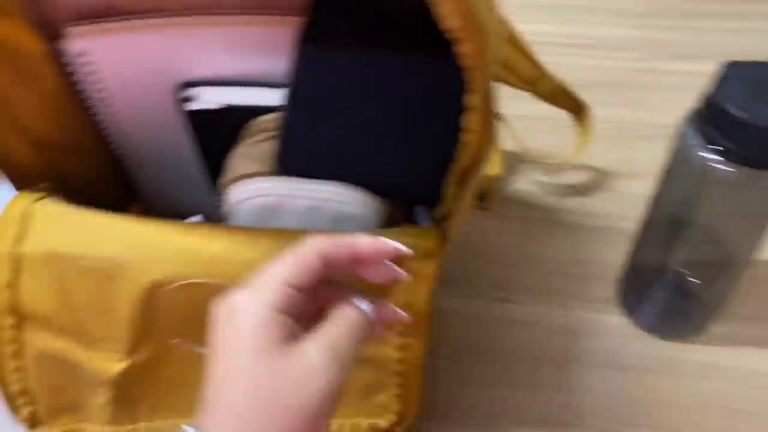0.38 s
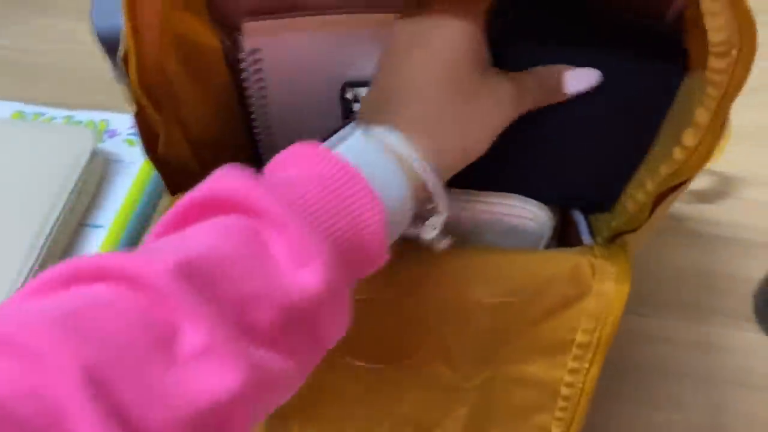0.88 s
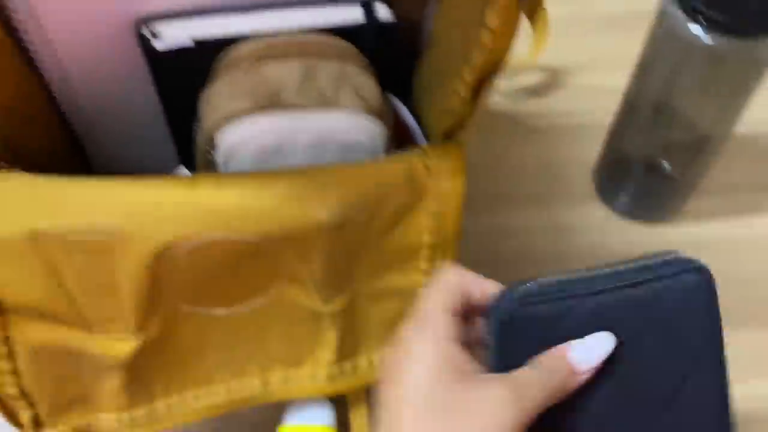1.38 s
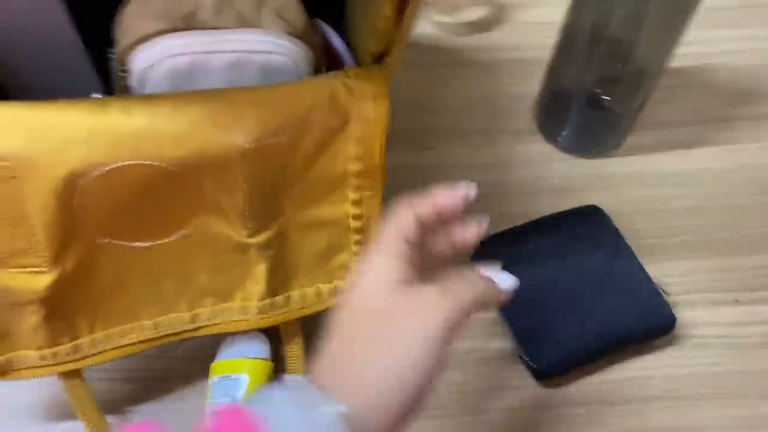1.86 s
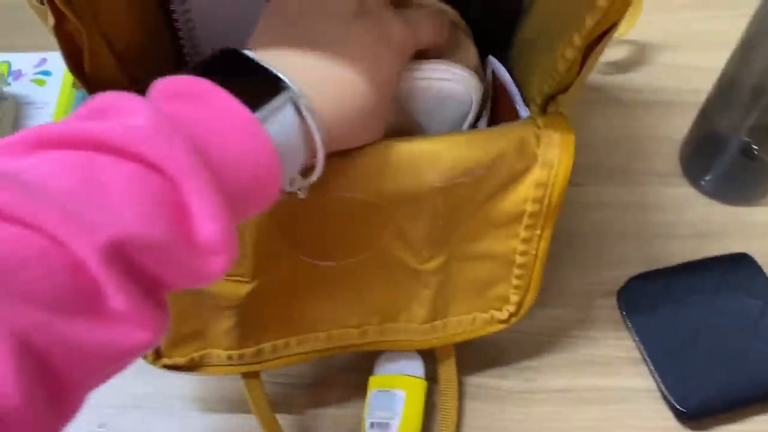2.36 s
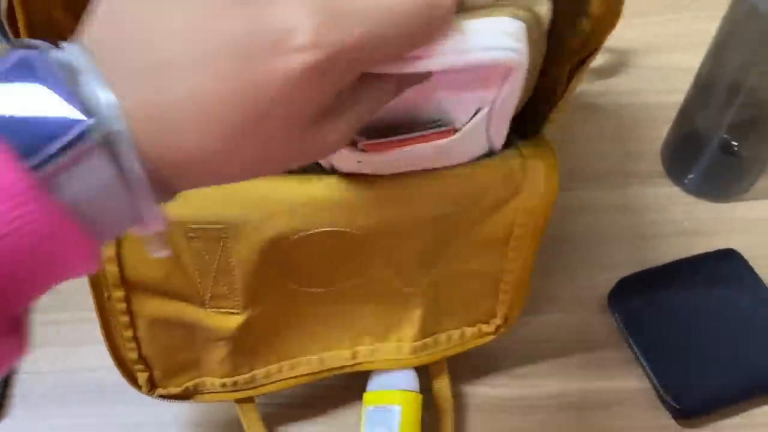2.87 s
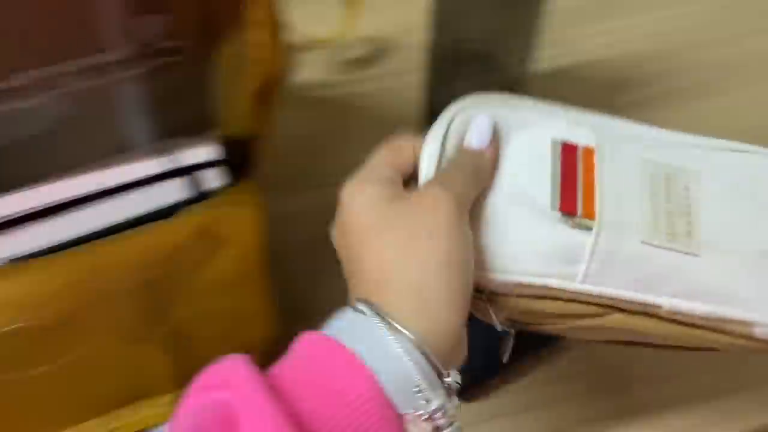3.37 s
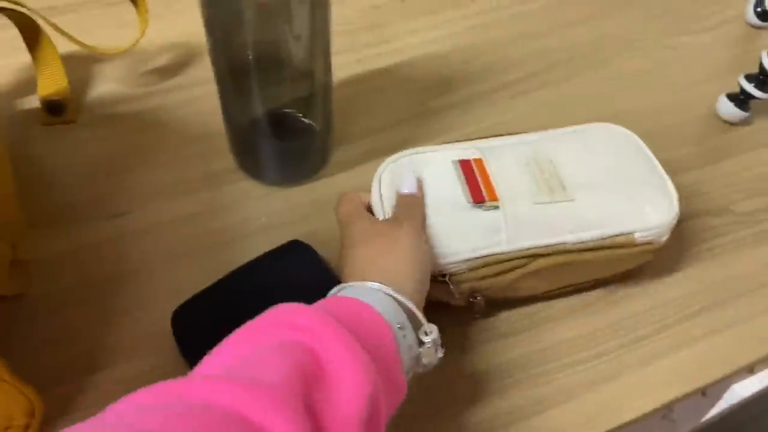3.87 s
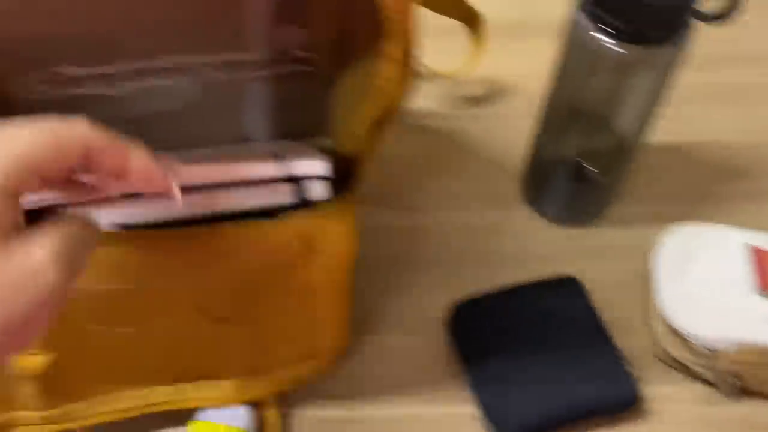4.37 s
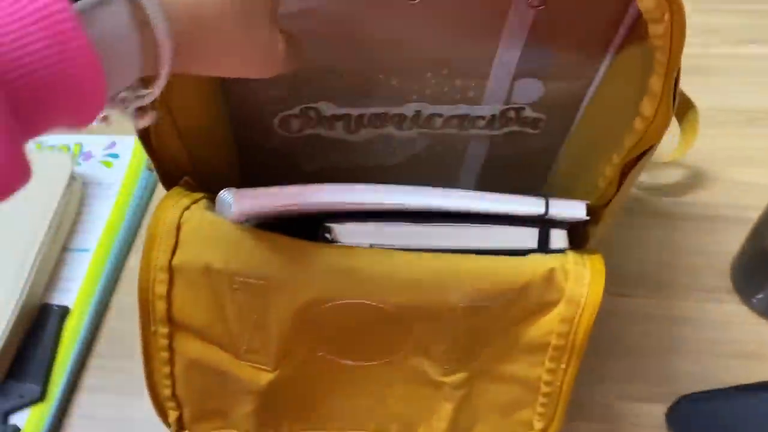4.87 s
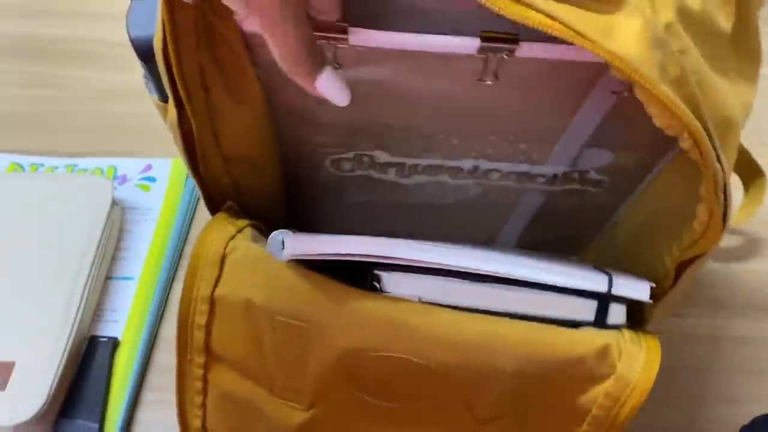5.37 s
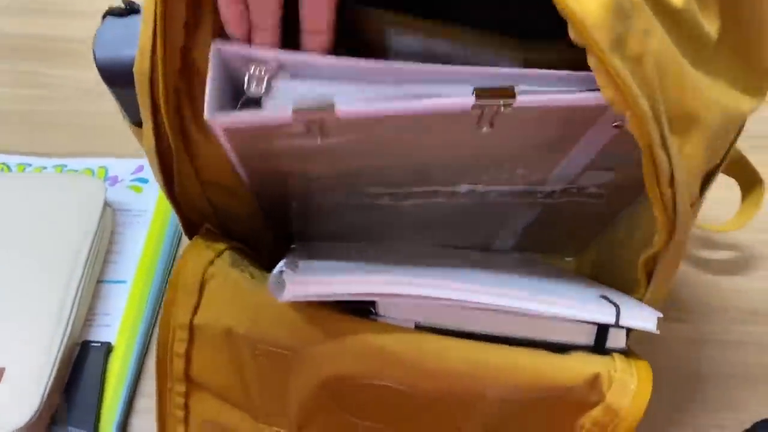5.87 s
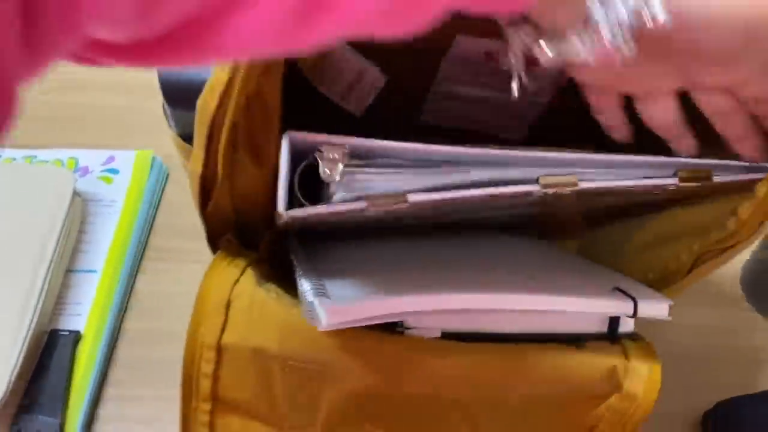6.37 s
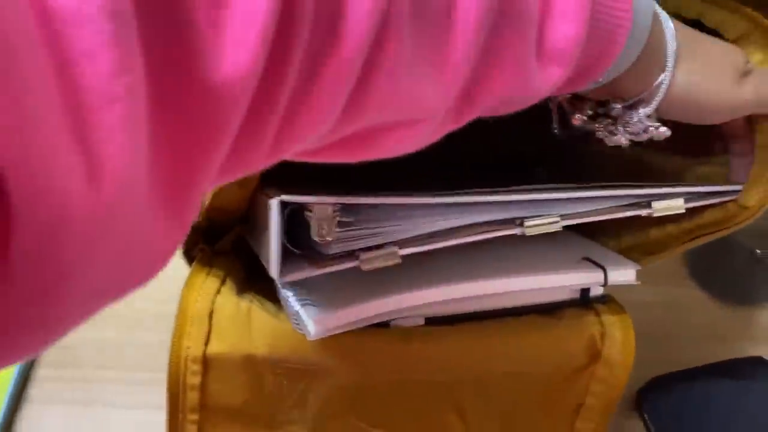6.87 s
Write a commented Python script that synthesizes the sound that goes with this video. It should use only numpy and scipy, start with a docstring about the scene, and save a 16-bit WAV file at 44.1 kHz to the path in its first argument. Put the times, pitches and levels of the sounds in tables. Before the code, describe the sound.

Pouches dragged from a cloth bag and set on wood with dull thumps, then a binder shuffled with rubbing, clacks and a loud snap.

```python
"""First a soft boom, faint crinkling cloth and a thin hiss; then knocks, ticks and heavier thuds on a desk.
A hand pulls a wallet and a pencil case out of a canvas backpack, sets them on wood and leafs through a binder.
Rubbing is noise in bursts of slips through resonances; weight adds free swings of the desk;
knocks are decaying tones with a noisy slap, ticks are short bright cracks, and both leave a short tail.
A hand-held phone with two microphone ports hears it from close by in a quiet room."""
import sys
import numpy as np
from scipy import signal
from scipy.fft import rfft, irfft, next_fast_len
from scipy.io import wavfile
from scipy.ndimage import uniform_filter1d

SR = 44100
rng = np.random.default_rng(int(sys.argv[2]) if len(sys.argv) > 2 else 0)


def voltage_ratio(decibels):
    """Convert decibels (scalar or array-like) to amplitude ratios, 20 dB per decade."""
    exponent = np.asarray(decibels, float) / 20
    return 10 ** exponent


def to_wav(s):
    """Save 16-bit WAV."""
    ch = np.atleast_2d(s).T  # columns
    pcm = np.round(np.clip(ch, -1, 1) * 32767)  # PCM
    wavfile.write(sys.argv[1], SR, pcm.astype(np.int16))


N = 308259
PAD = next_fast_len(N + SR)
HZ = np.maximum(np.fft.rfftfreq(PAD, 1 / SR), 1)

# air inside bag and pouches: f/Hz, width/Hz, relative level/dB
HOLLOW = [(358, 310, -0.5), (486, 120, -4), (640, 177, -2)]
# colour of scraping cloth, also of a knock's slap: f/Hz, relative density/dB per Hz
SCRAPE = [(470, -25), (800, -7), (1260, -6), (1490, -7), (2220, -10.5), (4320, -19.5), (6500, -25.5),
          (11000, -120)]
# weight lands or shifts on the desk: t/s, time to fade 20 dB/s, desk boom level/dB, bag body level/dB
# (a fade below zero: the noise lasts about 1 ms, the free swing grows until it stops)
SHOVES = [(0.0, 0.1264, -45, -59.5), (.3, 1.5, -70, -72.5), (.8, 0.25, -49.5, -63), (.97, 0.07, -52, -59),
          (1.311, .1, -49, -69), (1.44, 0.32, -46, -58), (1.581, 0.3453, -31.5, -41),
          (1.75, 0.15, -32.5, -35), (1.86, 0.1, -29.5, -33), (1.97, 0.21, -41.5, -60.5),
          (3.085, 0.18, -44.5, -45.5), (3.15, 0.28, -45, -53), (3.321, 0.07, -41, -49.5),
          (3.776, 0.1372, -44, -46.5), (3.95, 0.26, -54, -59), (4.076, 0.15, -37.5, -52),
          (4.279, 0.23, -56, -71), (4.76, 0.12, -46, -53), (4.85, 0.35, -46, -50),
          (5.15, 2.03, -59.5, -56.5), (5.34, 0.5, -54.5, -49.5), (5.641, 0.9, -53, -54),
          (5.78, 0.26, -51.5, -46.5), (5.949, 0.3, -51, -44.5), (6.04, -0.1, -47, -65.5),
          (6.21, 0.15, -28, -34), (6.29, 0.27, -29.5, -37), (6.42, 0.13, -28, -41.5),
          (6.6, 1.1, -46.5, -46.5), (6.85, 0.4, -47, -46)]
SHOVE_RISE = 0.2397  # rise time as a share of the fade


def unit(x):
    """Scale to rms 1."""
    return x / np.sqrt(np.mean(x ** 2))


def on_log(table):
    """A (f/Hz, value) table on the frequency axis, straight over log frequency."""
    hz, value = np.transpose(table)
    return np.interp(np.log(HZ), np.log(np.maximum(hz, 1)), value)


def on_time(table, rise, rounding):
    """Power of each level column over time: events rise and fade (rounding 1 = pointed top) and add up."""
    s, fade, *columns = np.transpose(table)[:, :, None]
    t = np.arange(0, N / SR + .002, .001)
    reach = np.abs(t - s) / np.maximum(fade * np.where(t < s, rise, 1), 1e-3)
    swell = voltage_ratio(-20 * reach ** rounding) ** 2
    powers = [np.sum(voltage_ratio(db) ** 2 * swell, axis=0) for db in columns]
    return np.array([np.interp(np.arange(N) / SR, t, power) for power in powers]) + 1e-14


def modes(table):
    """Gain of a set of resonances: each falls to half at half its width from the centre."""
    return sum(voltage_ratio(db) / (1 + (2 * (HZ - hz) / width) ** 2) for hz, width, db in table)


def shape(x, gain):
    """Filter by a gain over frequency."""
    return irfft(rfft(x, PAD) * gain, PAD)[..., :N]


def add(out, s, sound):
    """Mix a sound in at a time."""
    i = int(s * SR)
    out[:, i:i + sound.shape[-1]] += sound[..., :N - i]


def ports(envelope, gain):
    """Coloured noise under one envelope at both ports, partly shared and partly their own; rms 1."""
    # likeness of the two ports: f/Hz, shared part of the power/0-1
    likeness = [(60, .95), (250, .88), (700, .5), (6500, .4), (8000, .95), (10000, .995)]
    shared, left, right = rfft(envelope * rng.standard_normal((3, N)), PAD)
    alike = np.clip(on_log(likeness), 0, 1)
    both = np.sqrt(alike) * shared + np.sqrt(1 - alike) * np.array([left, right])
    return unit(irfft(gain * both, PAD)[:, :N])


def grains(rate, spread_db, smear_s):
    """Envelope of random slips per second: most small, a few large, sharp at the start, with a short tail."""
    size = voltage_ratio(spread_db * np.minimum(rng.exponential(size=N), 4))
    hits = (rng.random(N) < rate / SR) * size
    return np.sqrt(signal.lfilter([1], [1, -np.exp(-1 / (smear_s * SR))], hits ** 2) + 1e-12)


def rubbed(gain, db, rate, spread_db, smear_s):
    """Slips of friction ring one set of resonances."""
    return voltage_ratio(db) * ports(grains(rate, spread_db, smear_s), gain)


def patches(table, db, low_hz, step, width, rate, spread_db, smear_s, size, count):
    """Patches slip at once, each with its own timing and every count-th of size resonances a ratio step apart."""
    out = 0
    for k in range(count):
        pitches = low_hz * step ** np.arange(k, size, count)
        gain = modes([(hz, width * hz, 0) for hz in pitches]) * voltage_ratio(on_log(table))
        out = out + np.sqrt(np.mean(gain ** 2)) * rubbed(gain, 0, rate, spread_db, smear_s)
    return voltage_ratio(db) * unit(out)


def room():
    """The faint steady air of the room: coloured noise."""
    # colour of the air: f/Hz, relative density/dB per Hz
    air = [(18, -39), (30, -4), (66, 5.5), (235, -4), (1600, -30), (6550, -28), (8310, -36.5), (11400, -25),
           (13400, -58.5), (15200, -25), (16500, -36.5)]
    return voltage_ratio(-74) * ports(1, voltage_ratio(on_log(air)))


def hisses():
    """Something slides with a faint narrow hiss: noise through one resonance."""
    # slides: middle t/s, time to fade 20 dB/s, level/dB
    slides = [(.38, 0.15, -74), (.5, .12, -88), (.64, 0.13, -76)]
    power, = on_time(slides, rise=1, rounding=1.49)
    return np.sqrt(power) * ports(1, modes([(1583, 230, 0)]))


def desk_boom(db):
    """The loaded desk booms: long slips ring its lowest resonances."""
    # boom of the desk: f/Hz, width/Hz, relative level/dB
    boom = [(54.4, 32, -2.5), (62, 15, 1), (78.9, 4.2, 8.5), (105.5, 25, -2.5)]
    return rubbed(modes(boom), db, rate=300, spread_db=1.51, smear_s=0.032)


def bag_body(db):
    """Bag and desk top shake together: shorter slips ring their body resonances."""
    # bag and desk top: f/Hz, width/Hz, relative level/dB
    body = [(128, 30, 6.5), (199.6, 89, 4), (250, 65, -3.5)]
    return rubbed(modes(body), db, rate=120, spread_db=2.26, smear_s=0.0054)


def bag_hollow(db):
    """Slips of cloth ring the air inside bag and pouches."""
    return rubbed(modes(HOLLOW), db, rate=150, spread_db=3.5, smear_s=0.013)


def contents(db):
    """Small things inside bump each other: sparse, very short slips through hollow and scrape colours."""
    gain = modes(HOLLOW) + voltage_ratio(on_log(SCRAPE) - 5.0)
    return rubbed(gain, db, rate=25, spread_db=3, smear_s=0.0034)


def scrape(db):
    """Cloth scrapes in dense short slips while stiff panels drag on narrow resonances."""
    cloth = rubbed(voltage_ratio(on_log(SCRAPE)), db - 8, rate=500, spread_db=2.5, smear_s=0.003)
    panels = patches(SCRAPE, db - 4.5, low_hz=790, step=1.16, width=.085,
                     rate=60, spread_db=4, smear_s=.014, size=16, count=4)
    return cloth + panels


def crinkle(db):
    """Creases snap in rare brief slips on broad resonances; canvas rustles in denser, longer ones."""
    # colour of the crinkle: f/Hz, relative density/dB per Hz
    colour = [(2500, -7.5), (4000, -6), (5500, -11), (8000, -3), (11000, -10), (14000, -5.5), (15800, -12),
              (16300, -36.5)]
    creases = patches(colour, db - 4, low_hz=3000, step=1.7, width=.6,
                      rate=20, spread_db=4, smear_s=.0015, size=4, count=4)
    canvas = patches(colour, db + 2.5, low_hz=2200, step=1.2, width=.17,
                     rate=160, spread_db=3, smear_s=.007, size=12, count=4)
    return creases + canvas


def thumps():
    """Each shove also sets the desk swinging freely, its pitch varying a little at random from shove to shove."""
    out, t = np.zeros((2, N)), np.arange(SR // 2) / SR
    for (s, fade, boom_db, _), chance in zip(SHOVES, rng.standard_normal(len(SHOVES))):
        hz = 66 * (1 + 0.073 * chance)
        swell = 1 - np.exp(-t / 0.0091)
        ring = np.sin(2 * np.pi * hz * t) * voltage_ratio(-20 * t / fade) * swell
        start = max(s - SHOVE_RISE * fade / 2, 0)
        add(out, start, voltage_ratio(boom_db - 3) * ring / abs(ring).max())
    return out


def echo(x, t60, db):
    """Desk top and near walls return a short, dull tail, different at each port."""
    t = np.arange(SR // 4) / SR
    tail = rng.standard_normal((2, len(t))) * np.exp(-np.log(1000) * t / t60) * (1 - np.exp(-t / 0.003))
    tail = signal.lfilter([1], [1, -.6], tail)
    tail = voltage_ratio(db) * tail / np.sqrt(np.sum(tail ** 2, axis=1, keepdims=True))
    return x + signal.fftconvolve(x, tail, axes=1)[:, :N]


def ticks():
    """A hard contact: a crack of a few ms, brightest around its centre, weak an octave below."""
    # nails, zip pulls, charms and clips: t/s, peak level/dB, centre f/Hz, t60/s
    contacts = [(0.291, -52, 10430, 0.019), (0.698, -27.5, 4230, 0.0075), (.734, -36, 3000, 0.0065),
                (0.989, -38.5, 10600, .011), (1.0137, -41, 7150, .01), (1.188, -42.5, 11400, 0.017),
                (1.6139, -27.5, 2530, 0.0069), (1.646, -31, 2200, 0.0071), (1.96, -35, 2000, 0.027),
                (2.3228, -33, 2890, 0.013), (2.339, -24.5, 9300, 0.005), (2.5046, -36.5, 2300, 0.0084),
                (2.662, -32, 4360, 0.01), (2.803, -35, 9500, 0.0072), (2.848, -36.5, 3740, 0.016),
                (3.1354, -35, 4020, 0.015), (3.6187, -39, 11270, 0.014), (3.8935, -27, 10900, 0.032),
                (4.282, -42, 11900, 0.014), (4.8216, -36, 7260, .012), (4.97, -43.5, 1300, .012),
                (5.251, -32, 4040, 0.028), (5.5575, -37.5, 3720, 0.011), (5.578, -34, 10200, 0.012),
                (5.7916, -8.5, 8400, 0.0074), (5.945, -31, 6500, 0.012), (5.953, -29, 10100, 0.011),
                (6.0556, -32.5, 1700, 0.008), (6.173, -25.5, 7500, .012), (6.2013, -24, 3230, 0.004),
                (6.474, -20, 11600, 0.0027), (6.7517, -34.5, 9150, 0.0043)]
    out, t = np.zeros((2, N)), np.arange(SR // 20) / SR
    noise = rng.standard_normal((len(contacts), len(t)))
    for (s, db, hz, t60), n in zip(contacts, noise):
        crack = signal.lfilter(*signal.butter(2, 0.94 * hz, "high", fs=SR), n)
        crack = crack + 1.33 * signal.lfilter(*signal.iirpeak(min(hz, 15000), 3.2, fs=SR), n)
        crack = signal.lfilter(*signal.butter(1, min(3 * hz, .45 * SR), fs=SR), crack)
        crack = crack * np.exp(-np.log(1000) * t / max(t60, .002)) * (1 - np.exp(-t / 0.0011))
        add(out, s, voltage_ratio(db) * crack / abs(crack).max())
    return out


def blows(table, sag):
    """A blow swells within a cycle, rings at its pitch and two weaker neighbours, and slaps."""
    sag_s = .005  # time constant of losing the share sag of the pitch
    out, t = np.zeros((2, N)), np.arange(SR // 5) / SR
    chance = rng.random((len(table), 4))
    noise = rng.standard_normal((len(table), len(t)))
    slaps = shape(noise, voltage_ratio(on_log(SCRAPE)))[:, :len(t)]
    slap_fade = np.exp(-t / 0.0029) * (1 - np.exp(-t / 0.00079))
    for (s, db, hz, t60, slap_db), c, slap in zip(table, chance, slaps):
        fade = np.exp(-np.log(1000) * t / max(t60, .005))
        turns = hz * ((1 - sag) * t + sag * sag_s * (1 - np.exp(-t / sag_s)))
        ring = np.sin(2 * np.pi * turns)
        ring = ring + voltage_ratio(-11.0) * np.sin(2 * np.pi * ((1.353 + 0.4 * c[0]) * turns + c[1]))
        ring = ring + voltage_ratio(-9.0) * np.sin(2 * np.pi * ((0.544 + 0.22 * c[2]) * turns + c[3]))
        ring = ring * fade * (1 - np.exp(-t * hz * 1.43))
        # a small object radiates little below its own pitch
        ring = signal.lfilter(*signal.butter(2, (1 - sag) * hz / 2, "high", fs=SR), ring)
        slap = voltage_ratio(slap_db + 0.5) * unit(slap) * slap_fade
        add(out, s, voltage_ratio(db) * (ring / abs(ring).max() + slap))
    return out


def knocks():
    """Knocks of objects, and one faint high metal ring, at steady pitches."""
    # struck objects: t/s, peak level of the ring/dB, pitch f/Hz, t60/s, slap level relative to the ring/dB
    struck = [(.699, -40.5, 653, 0.03, -10), (.733, -45, 673, 0.1, -1), (.927, -48.5, 640, 0.037, -20),
              (1.613, -27, 1030, 0.027, 5.5), (1.615, -38, 6200, 0.13, -30),
              (1.627, -30.5, 1040, 0.0156, 7.5), (1.6465, -27, 1290, 0.04, 6.5),
              (1.713, -21.5, 143, 0.018, -32), (1.728, -27.5, 205, 0.029, -30),
              (1.762, -15, 138, 0.012, -43), (1.947, -25, 182, 0.04, -32), (2.197, -37.5, 486, 0.034, -13),
              (2.324, -31, 760, 0.0082, -16), (2.338, -35, 640, 0.026, 3), (2.419, -36, 457, 0.061, -28),
              (2.619, -35, 620, 0.016, -2), (2.662, -21.5, 265, 0.03, -13), (2.931, -37.5, 236, 0.078, -20),
              (3.052, -32.5, 322, 0.14, -31), (3.136, -25.5, 460, 0.019, -9),
              (3.301, -35, 250, 0.019, -6.5), (3.749, -28, 429, 0.098, -22), (3.7525, -30, 520, .04, -3.5),
              (3.886, -37, 473, .05, -9.5), (3.893, -34, 476, 0.056, -10),
              (5.062, -44.5, 1650, 0.023, -8.5), (5.063, -39, 546, .04, -30),
              (5.35, -30.5, 203, 0.036, -18), (5.357, -28, 586, 0.018, -14.5), (5.793, -26, 750, 0.011, -9),
              (5.833, -34.5, 640, 0.07, -25.5), (5.862, -37, 616, 0.09, -26),
              (6.2015, -23, 600, 0.019, -10), (6.259, -21, 148.8, 0.015, -16),
              (6.853, -32.5, 560, 0.08, -12), (6.902, -40.5, 1555, .06, 2)]
    return blows(struck, sag=0)


def covers():
    """Stiff covers slap shut, their ring sagging to a quarter of its first pitch."""
    # slaps: t/s, peak level of the ring/dB, first pitch f/Hz, t60/s, slap level relative to the ring/dB
    stiff = [(2.53, -29.5, 896, 0.032, -29.5), (5.9235, -20.5, 978, 0.042, -14.5),
             (5.9455, -18, 880, 0.043, -10)]
    return blows(stiff, sag=.75)


def handling():
    """The hand works bag and cloth: strokes and settling contents rub, and shake desk and bag with the shoves."""
    # drags of cloth or contents, swelling and fading: middle t/s, time to fade 20 dB/s,
    # then hollow, scrape and crinkle level/dB, before each layer's share (a fade below zero lasts about 1 ms)
    strokes = [(.17, 0.33, -73, -78, -79.5), (.39, 0.18, -70.5, -89, -79.5), (.66, 0.04, -64, -76, -76),
               (.78, 0.04, -51, -59, -61), (.93, 0.07, -57, -64, -61), (1.0, 0.01, -60.5, -58, -58),
               (1.05, 0.1, -71, -74, -71), (1.225, 0.04, -81, -68, -66), (1.4, 0.17, -70.5, -77, -69.5),
               (1.7, .055, -48, -35, -58), (1.79, 0.16, -42, -41.5, -59), (1.98, 0.13, -48, -50.5, -58),
               (2.09, -0.3, -66.5, -64, -66), (2.39, 0.03, -45, -54, -59.5), (2.55, 0.74, -51, -55.5, -65),
               (2.72, 0.1, -51.5, -54, -58.5), (2.89, 0.28, -49.5, -48.5, -50),
               (3.06, 0.1, -39.5, -48.5, -75), (3.16, 0.08, -40, -48, -60), (3.25, 0.2, -49.5, -54.5, -62),
               (3.33, 0.08, -48, -53, -59), (3.58, 0.9, -68, -70, -66.5), (3.83, 0.08, -51.5, -64, -66.5),
               (3.97, 0.03, -54.5, -64, -62), (4.05, 0.11, -51, -55, -60.5), (4.25, 0.22, -71, -76.5, -72),
               (4.78, 0.17, -52.5, -59, -59), (5.0, 0.21, -47.5, -55, -62), (5.17, 0.2, -57.5, -64, -69.5),
               (5.43, 0.1, -44, -55.5, -69), (5.55, 0.03, -49, -63, -50.5), (5.7, 0.4, -63.5, -63, -62),
               (6.05, 0.27, -56, -55.5, -88), (6.172, 0.065, -38, -38.5, -46), (6.23, 0.09, -34, -36, -42),
               (6.4, 0.27, -42, -47, -57.5), (6.67, 0.3, -45.5, -50.5, -55.5),
               (6.88, 0.24, -44, -47, -58.5)]
    # contents settle after a bump, sudden then dying: t/s, then the same columns
    settles = [(.702, 0.16, -53.5, -61, -59.5), (1.616, 0.16, -41, -33, -51), (2.2, 0.4, -48, -55.5, -57.5),
               (3.755, 0.11, -46, -50, -62), (3.893, 0.1, -52.5, -56, -56.5),
               (5.255, 1.6, -50.5, -58.5, -61), (5.795, 0.3, -48.5, -55.5, -54),
               (5.95, 0.15, -45, -53, -70), (6.128, 0.15, -45, -46, -56)]
    cloth = on_time(strokes, rise=1, rounding=1.49) + on_time(settles, rise=0.016, rounding=1.29)
    cloth_to_weight = voltage_ratio(np.array([[-28], [-12]])) ** 2  # rubbing cloth also shakes desk and bag
    weight = on_time(SHOVES, SHOVE_RISE, rounding=1.19) + cloth_to_weight * cloth[0]
    desk_db, body_db = 10 * np.log10(weight)
    hollow_db, scrape_db, crinkle_db = 10 * np.log10(cloth)
    low = desk_boom(desk_db) + bag_body(body_db) + bag_hollow(hollow_db)
    return low + contents(hollow_db - 9.5) + scrape(scrape_db) + crinkle(crinkle_db)


def scene():
    """Room, sliding hiss, desk, blows and handling; knocks wake the desk top more than ticks do."""
    knocking = echo(knocks() + covers(), t60=.05, db=-11)
    ticking = echo(ticks(), t60=.05, db=-17)
    return room() + hisses() + thumps() + ticking + knocking + handling()


def loud_bass(dry):
    """Strong low shakes arrive alike at both ports, the right one a little ahead."""
    from_db, lead = -37, .65  # level around which this sets in; radians the right port leads
    bass = shape(dry, 1 / (1 + (HZ / 350) ** 4))
    turning = signal.hilbert(bass.mean(axis=0), PAD)[:N]
    db = 10 * np.log10(uniform_filter1d(abs(turning) ** 2 / 2, SR // 4) + 1e-12)
    strong = 1 / (1 + voltage_ratio(4 * (from_db - db)))
    alike = np.real(turning * np.exp(.5j * lead * np.array([[-1], [1]])))
    return dry + strong * (alike - bass)


def band_limit(x):
    """A steep low-pass at the top of the band."""
    return signal.sosfilt(signal.butter(12, 17020, fs=SR, output="sos"), x)


def record(dry):
    """Left and right differ in stepped phase and in level, cancelling narrow treble bands in their sum."""
    # stereo phase, in steps over frequency: f/Hz, lead of the left channel/radians
    lead = [(0, 0), (1890, .2), (3000, 1.4), (3700, .4), (7000, -.4), (8100, -3.2), (8800, -3.4),
            (10400, -6.28), (11500, -6.3), (12850, -9.4), (13900, -9.45), (15250, -12.55)]
    # stereo level: f/Hz, left minus right level/dB
    lean = [(60, 0), (200, 1), (380, 2), (700, 6), (1290, 1.5), (2500, 0), (6000, 2)]
    left = voltage_ratio(on_log(lean) / 2) * np.exp(.5j * np.interp(HZ, *np.transpose(lead)))
    treble_end = 1 / (1 + (HZ / 16600) ** 60)
    mix = shape(loud_bass(dry), np.array([left, 1 / left]) * treble_end)
    return band_limit(mix)


dry = scene()
out = record(dry)
to_wav(out)
```